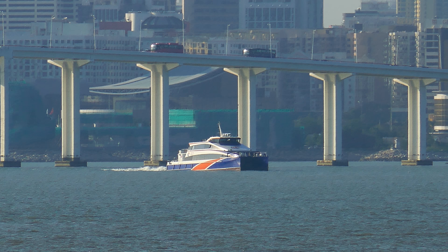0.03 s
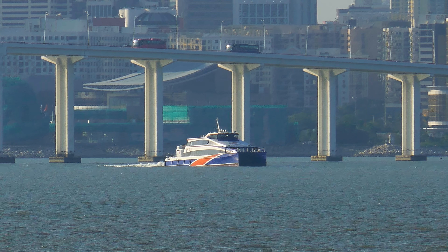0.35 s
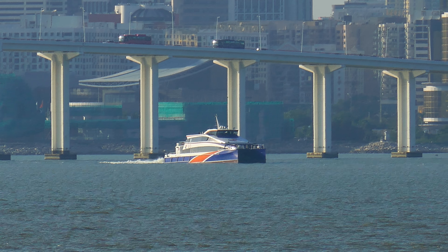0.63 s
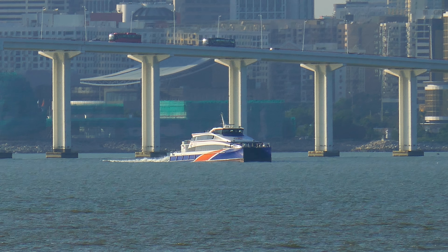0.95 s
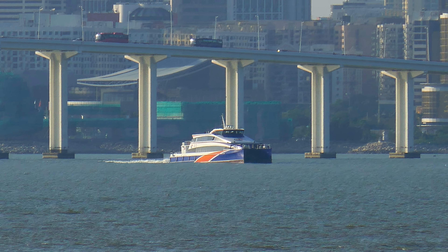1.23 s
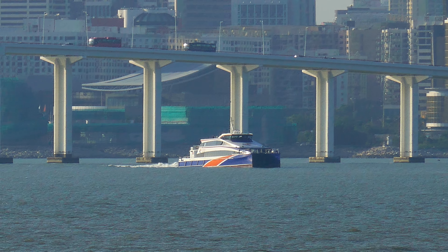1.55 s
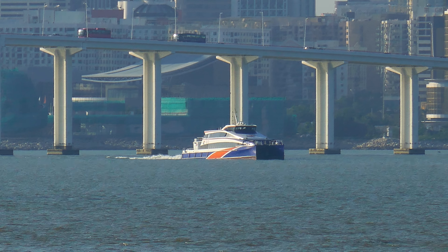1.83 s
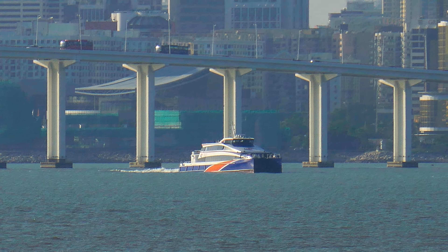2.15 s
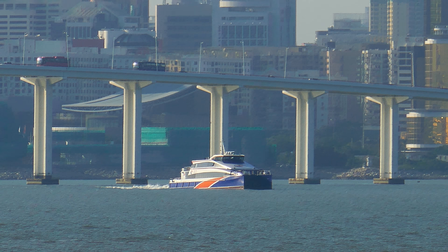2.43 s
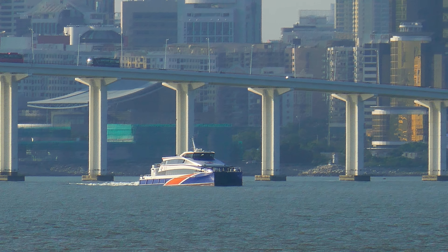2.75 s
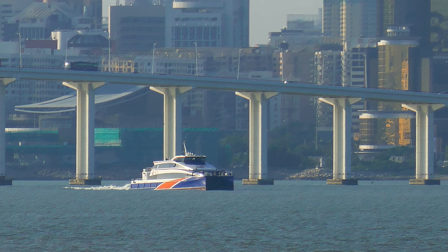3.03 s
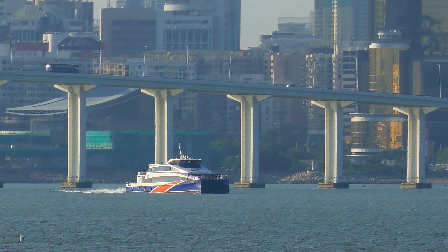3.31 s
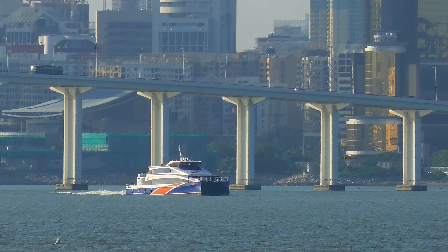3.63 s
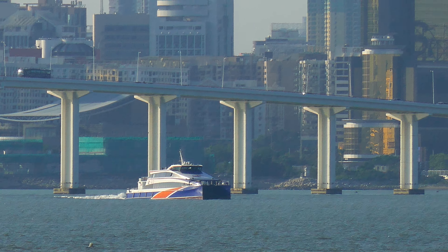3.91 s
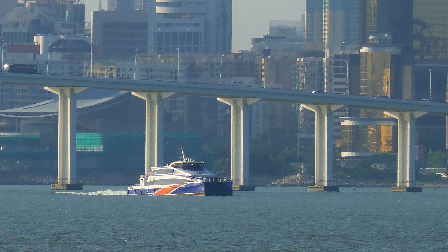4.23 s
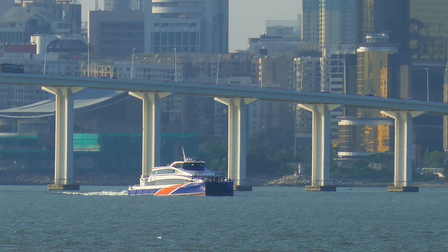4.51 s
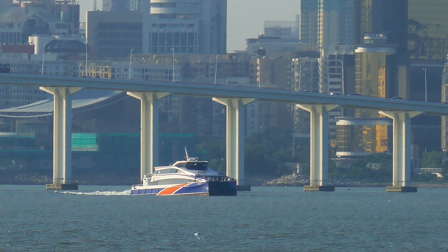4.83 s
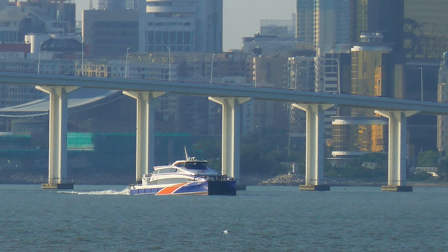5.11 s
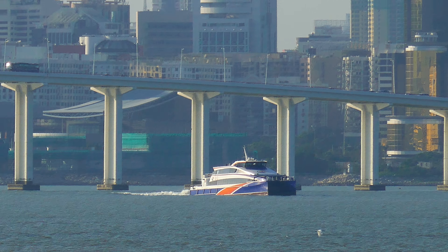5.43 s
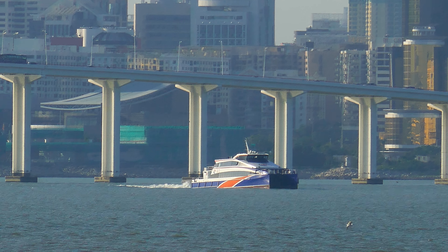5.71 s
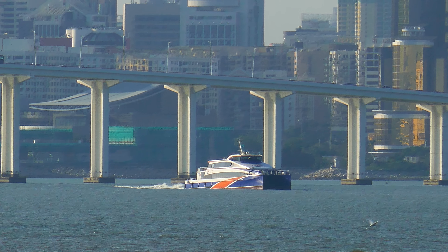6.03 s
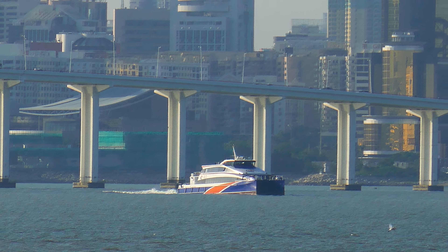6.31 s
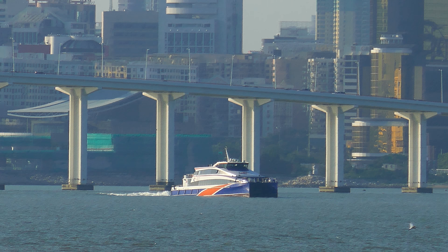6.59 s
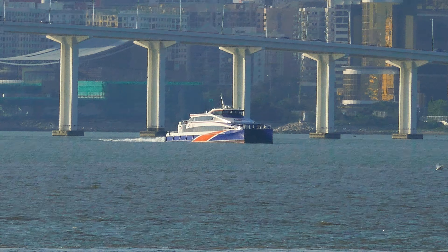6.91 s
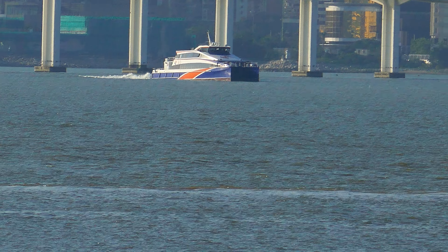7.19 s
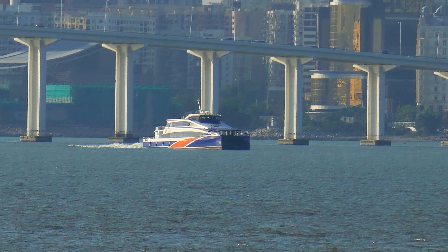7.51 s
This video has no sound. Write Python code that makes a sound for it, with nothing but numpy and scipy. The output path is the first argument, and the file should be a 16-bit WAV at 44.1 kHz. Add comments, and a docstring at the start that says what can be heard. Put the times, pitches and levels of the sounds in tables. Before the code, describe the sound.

Wind buffets an outdoor microphone on a shore in uneven lumps and thumps. Behind it, a distant ferry drones with a wash of churned water, growing loudest and hissier near the middle before sinking back. After the swell come a faint high squeak and a soft, airy whistle of wind. The gusts keep thudding to the end, with an occasional small tick nearby.

```python
"""Gusts buffet a microphone in short low thuds and hiss past it, on a shore far from a fast ferry.
The ferry's engines and water jets blur into one roar that swells and fades under a rush of churned water;
turbulence along the path makes both flutter. The thuds are pressure swings of eddies, and the level
dips briefly after some of them. Faint ticks, a stick-slip squeak and a breathy whistle sound close by."""
import sys
import numpy as np
from scipy import signal
from scipy.fft import rfft, irfft
from scipy.io import wavfile
from scipy.ndimage import uniform_filter1d

SR = 44100
rng = np.random.default_rng(int(sys.argv[2]) if len(sys.argv) > 2 else 0)


def generate_wav(signal):
    """Clip the signal to [-1, 1] and save it as 16-bit WAV at the path in sys.argv[1]."""
    frames = np.transpose(np.atleast_2d(signal))
    scaled = np.clip(frames, -1, 1) * 32767
    pcm = np.round(scaled).astype(np.int16)
    wavfile.write(sys.argv[1], SR, pcm)


N = 341775
TIME = np.arange(N) / SR
FREQ = np.fft.rfftfreq(N, 1 / SR)

# stereo width by frequency: (frequency [Hz], side minus mid [dB])
STEREO_WIDTH = [(30, -16.5), (70, -13.5), (125, -22.5), (250, -45), (600, -71), (2000, -35), (3000, -21.5),
                (4800, -28), (6500, -27.5), (7600, 3.5), (9000, 0), (12000, -4), (15000, -6.5)]
# swell of the ferry: (time [s], relative roar level [dB], relative water level [dB])
FERRY_SWELL = [(0, -36, -40), (.22, -31, -36.5), (.39, -40, -43.5), (.6, -33.5, -37), (1, -35.5, -40.5),
               (2.05, -38, -42.5), (2.33, -34, -39.5), (2.5, -40.5, -43), (2.9, -36, -41),
               (3.02, -34, -41.5), (3.2, -35, -41.5), (3.65, -28.5, -34), (4.27, -30.5, -37),
               (4.38, -38, -39.5), (4.7, -35.5, -40.5), (5.43, -38, -46), (5.6, -34.5, -41.5),
               (6.28, -36.5, -45.5), (6.36, -41, -48), (6.6, -48, -49.5), (6.77, -45.5, -47.5),
               (6.84, -41.5, -46.5), (7.15, -41, -46), (7.62, -38.5, -44), (7.75, -48, -51.5)]


def gain_of(db):
    """Amplitude ratio: tenfold for every 20 dB."""
    return 10 ** (np.asarray(db) / 20)


def unit_rms(x):
    """Normalisation to unit mean power."""
    return x / np.sqrt(np.mean(x ** 2) + 1e-20)


def response(points, hz):
    """Magnitude response, interpolated in dB over log frequency."""
    f, db = np.transpose(points)
    return gain_of(np.interp(np.log(hz + 1), np.log(f + 1), db))


def envelope(rows, column=1):
    """Amplitude envelope, interpolated in dB over time."""
    columns = np.transpose(rows)
    return gain_of(np.interp(TIME, columns[0], columns[column]))


def bell(s, length):
    """Gaussian pulse of height 1, centred on time s."""
    return np.exp(-2 * ((TIME - s) / length) ** 2)


def puffs(rows):
    """Gaussian pulses summed in amplitude."""
    return sum(gain_of(db) * bell(s, length) for s, db, length in rows)


def bumps_db(rows):
    """Gaussian pulses summed in decibels."""
    return sum(db * bell(s, length) for s, db, length in rows)


def add(mix, s, sound):
    """Superposition of a sound on the mix from time s."""
    part = mix[..., max(round(s * SR), 0):][..., :sound.shape[-1]]
    part += sound[..., :part.shape[-1]]


def wander(rate_hz):
    """Low-pass random fluctuation of rms 1."""
    return unit_rms(irfft(rfft(rng.standard_normal(N)) / (1 + (FREQ / rate_hz) ** 4), N))


def noise(magnitude):
    """Mid-side stereo noise: nearly mono in the bass and mids, wide in the high treble."""
    # channel balance: (frequency [Hz], left minus right [dB])
    balance = [(5000, 0), (8500, 2), (10000, 2), (12000, -1), (15000, -1)]
    mid, side = rfft(rng.standard_normal((2, N)))
    side = side * response(STEREO_WIDTH, FREQ)
    lean = np.sqrt(response(balance, FREQ))
    channels = np.array([(mid + side) * lean, (mid - side) / lean])
    return unit_rms(irfft(channels * magnitude, N))


def band(spectrum):
    """Spectral shaping of white noise."""
    return noise(response(spectrum, FREQ))


def resonant_noise(modes):
    """Noise shaped by steep spectral peaks, whose levels set their shares of the energy."""
    return noise(sum(gain_of(db) / np.sqrt(width) / (1 + ((FREQ - hz) / width) ** 2) ** 2
                     for hz, width, db in modes))


def low_cut(x):
    """High-pass filtering: the microphone's wind filter attenuates below 160 Hz."""
    return signal.sosfilt(signal.butter(4, 160, "highpass", fs=SR, output="sos"), x)


def scintillate(x, depth_db):
    """Scintillation: turbulent air on the path fades patches of the spectrum in and out."""
    frames = dict(nperseg=1024, noverlap=768)
    spectra = signal.stft(x, **frames)[2]
    patches = uniform_filter1d(rng.standard_normal(spectra.shape[1:]), size=4, axis=0)
    patches = unit_rms(uniform_filter1d(patches, size=16, axis=1))
    return unit_rms(signal.istft(spectra * gain_of(depth_db * patches), **frames)[1][:, :N])


def treble_gains():
    """Common modulation: swishes of spray move the gains of hiss and spray together."""
    # slow trend: (time [s], relative hiss level [dB], relative spray level [dB])
    trend = [(0, -67.5, -68), (.24, -66, -71), (.36, -73.5, -73), (.68, -66, -69.5), (.95, -70, -74.5),
             (2.1, -67, -71), (2.55, -64, -71), (3.17, -63, -66), (3.3, -59, -66), (3.65, -53, -57.5),
             (4.2, -60, -61), (4.36, -62.5, -64.5), (4.6, -64, -64), (5.25, -70.5, -71), (5.7, -69, -68),
             (6.25, -71, -71.5), (6.52, -76.5, -78.5), (6.95, -70.5, -75.5), (7.58, -67, -71),
             (7.75, -74, -80)]
    # swishes: (peak time [s], lift [dB], length [s])
    swishes = [(2.1, -1, .1), (2.33, 4, 0.13), (2.677, 2, 0.14), (2.896, 3.5, 0.067), (4.13, 2, 0.076),
               (4.5, 3, 0.058)]
    lift = gain_of(bumps_db(swishes))
    return envelope(trend, column=1) * lift, envelope(trend, column=2) * lift


def self_noise():
    """Self-noise of the microphones: a steady floor, uncorrelated between the channels."""
    # noise floor: (frequency [Hz], relative spectral density [dB])
    floor = [(20, -5.5), (100, -2), (300, 5), (800, -11.5), (2200, 1), (3500, -5.5), (5000, -16),
             (5600, -32)]
    white = rfft(rng.standard_normal((2, N)))
    return gain_of(-76) * unit_rms(irfft(white * response(floor, FREQ), N))


def faint_bands():
    """Narrow-band noise: two very faint bands near 6 and 7 kHz drift in level."""
    # envelope of the bands: (time [s], level [dB])
    band_level = [(0, -89), (.8, -86), (1.8, -84), (2.7, -91.5), (4.8, -98), (5.6, -88.5), (6.5, -89),
                  (7, -82.5), (7.75, -86)]
    # noise bands: (frequency [Hz], width [Hz], relative level [dB])
    band_peaks = [(6150, 320, 4.5), (6900, 270, 1.5)]
    return envelope(band_level) * resonant_noise(band_peaks)


def breeze():
    """Turbulent flow noise: an airy hiss that swells and flutters."""
    # airy hiss: (frequency [Hz], relative spectral density [dB])
    hiss_spectrum = [(5500, -59.5), (7000, -46), (7700, -24.5), (8200, -11.5), (9000, -2), (9800, 4),
                     (11000, 1.5), (13000, 0), (15000, -2.5), (15700, -15.5)]
    hiss_gain, _ = treble_gains()
    flutter_db = 0.6 * wander(rate_hz=14) + 0.4 * wander(rate_hz=70)
    return gain_of(4.5 + flutter_db) * hiss_gain * scintillate(band(hiss_spectrum), depth_db=1.5)


def ticks():
    """Exponential decay of small band-limited noise bursts near the microphone."""
    # ticks: (time [s], level [dB], centre [Hz], width [Hz], 60 dB decay time [s])
    bursts = [(1.889, -51, 13000, 2200, 0.049), (3.268, -42, 3100, 450, .04), (3.274, -38, 2220, 500, .07),
              (4.708, -51.5, 12500, 1500, .05), (5.178, -45.5, 12900, 2000, .016),
              (6.448, -62, 12000, 1800, .08), (6.935, -59, 11500, 1800, .06), (6.987, -44, 2650, 200, 0.04),
              (6.987, -37, 1600, 800, 0.03)]
    out, t = np.zeros((2, N)), TIME[:SR // 4]
    f = np.fft.rfftfreq(len(t), 1 / SR)
    rise = np.minimum(t / 0.00068, 1)
    for s, db, hz, width, t60 in bursts:
        mid, side = rfft(rng.standard_normal((2, len(t)))) * np.exp(-.5 * ((f - hz) / width) ** 2)
        side = side * response(STEREO_WIDTH, f)
        burst = unit_rms(irfft(np.array([mid + side, mid - side]), len(t)))
        add(out, s, gain_of(db) * burst * rise * np.exp(-np.log(1000) * t / t60))
    return low_cut(out)


def squeak():
    """Stick-slip friction excites a surface's high resonances in uneven grains."""
    # one sharp slip and two small ones: (time [s], level [dB])
    slip_level = [(5.385, -120), (5.397, -50), (5.408, -54), (5.425, -64), (5.5, -65), (5.545, -68),
                  (5.555, -61), (5.567, -67), (5.58, -60), (5.61, -120)]
    # surface resonances: (frequency [Hz], width [Hz], relative level [dB])
    surface_modes = [(9600, 1000, 3), (6300, 500, -26)]
    grains = unit_rms(gain_of(2.8 * wander(rate_hz=200)))
    return envelope(slip_level) * grains * resonant_noise(surface_modes)


def whistle():
    """Flow-excited resonance: a gust sings in breathy puffs, the stronger ones raising an overtone."""
    # puffs of air: (peak time [s], level [dB], length [s])
    air_puffs = [(5.692, -42.5, 0.11), (5.86, -44, 0.072), (6.027, -45.5, 0.41)]
    # resonances and overtone: (frequency [Hz], width [Hz], relative level [dB])
    main_modes = [(1927, 120, 7.5), (2170, 71, 3.5)]
    overtone_modes = [(3770, 100, 0)]
    blow = puffs(air_puffs)
    overtone_gain = gain_of(-59) * (blow / blow.max()) ** 1.5
    tone = blow * resonant_noise(main_modes) + overtone_gain * resonant_noise(overtone_modes)
    tone *= gain_of(wander(rate_hz=20))
    warped_time = TIME + np.cumsum(0.005 * wander(rate_hz=10)) / SR  # pitch wavers by 0.5 % rms
    return np.array([np.interp(warped_time, TIME, channel) for channel in tone])


def wind_strength():
    """Power addition of bell-shaped gusts and a light, uneven breeze."""
    # gusts: (peak time [s], relative level [dB], length [s])
    gusts = [(0.014, -30.5, 0.058), (0.295, -34.5, 0.17), (0.703, -40, 0.019), (0.925, -34, 0.038),
             (1.118, -35, 0.037), (1.34, -34.5, 0.048), (1.471, -43.5, 0.077), (1.988, -38.5, 0.069),
             (2.44, -33.5, 0.1), (2.772, -37.5, 0.042), (3.128, -45, 0.038), (3.87, -36.5, 0.36),
             (4.065, -35, 0.021), (4.27, -32, 0.14), (5.024, -39.5, 0.14), (5.278, -32, 0.03),
             (5.416, -36, 0.02), (5.796, -44.5, 0.21), (6.332, -35, 0.087), (6.5, -35.5, 0.13),
             (6.586, -38.5, 0.03), (6.998, -40, 0.038), (7.176, -39, 0.12), (7.689, -34, 0.071)]
    light_wind = gain_of(-48 + 3.7 * wander(rate_hz=6.4))
    return np.hypot(puffs(gusts), light_wind)


def thuds():
    """Pressure transients: each large eddy is one abrupt swing, a sine under a Gaussian window."""
    # eddies: (peak time [s], level [dB], frequency [Hz], length [s])
    eddies = [(0.022, -21, 650, 0.0012), (0.331, -22.5, 454, 0.0031), (0.674, -22.5, 510, 0.0029),
              (0.692, -27.5, 594, 0.004), (0.712, -25.5, 710, 0.0034), (0.7188, -23, 575, 0.0053),
              (0.7232, -22.5, 340, 0.0025), (0.932, -27, 290, 0.0069), (0.9385, -22.5, 375, 0.0021),
              (1.312, -24, 530, 0.0027), (2.1817, -24, 560, 0.0025), (2.39, -23, 340, 0.002),
              (2.423, -26, 435, 0.0034), (2.792, -25.5, 380, 0.0038), (2.798, -25, 342, 0.003),
              (3.4035, -19.5, 530, .0016), (3.423, -21, 520, 0.0023), (3.4685, -20, 600, 0.0019),
              (3.672, -18, 510, 0.0023), (3.8835, -19, 530, 0.0014), (3.979, -23, 450, 0.0026),
              (3.992, -24.5, 315, 0.011), (4.092, -19, 420, 0.0019), (4.108, -23, 400, 0.0034),
              (4.123, -23.5, 490, 0.0044), (4.2345, -13, 477, 0.0011), (4.284, -24, 330, 0.002),
              (4.296, -20, 400, 0.0034), (4.301, -23.5, 380, 0.0028), (4.616, -31, 570, 0.00093),
              (4.959, -20, 530, .0017), (5.201, -21, 517, 0.0012), (5.3934, -29, 480, 0.0018),
              (5.4205, -26, 360, 0.0025), (6.324, -30.5, 410, 0.0051), (6.351, -35, 420, .0016),
              (6.376, -26, 380, 0.0024), (6.449, -28.5, 380, 0.0034), (6.4643, -28, 360, 0.0023),
              (6.4712, -32, 430, 0.0028), (6.479, -24, 450, 0.0014), (6.489, -38, 330, 0.0037),
              (6.4953, -27, 287, 0.0038), (6.5357, -23.5, 423, 0.0013), (6.998, -30.5, 450, 0.0032),
              (7.156, -31, 403, 0.0011), (7.204, -32, 360, 0.0025), (7.621, -25, 560, 0.0012),
              (7.625, -22.5, 333, .0028), (7.645, -25.5, 390, 0.0023), (7.6617, -29, 450, 0.0016),
              (7.691, -22.5, 380, 0.0021), (7.711, -25, 390, 0.002)]
    out, t = np.zeros(N), TIME[:SR // 40] - TIME[SR // 80]
    for (s, db, hz, length), phase in zip(eddies, rng.random(len(eddies))):
        window = np.exp(-2 * (t / length) ** 2)
        add(out, s + t[0], gain_of(db) * window * np.sin(2 * np.pi * (hz * t + phase)))
    return out


def buffeting():
    """Turbulent pressure: eddies strike the microphone in lumps and thuds, over a deep rumble."""
    # wind lumps and deep rumble: (frequency [Hz], relative spectral density [dB])
    lump_spectrum = [(60, -46), (130, -20.5), (180, -6.5), (250, 0), (340, -1), (450, -4), (700, -30),
                     (1200, -39.5), (5000, -82)]
    rumble_spectrum = [(20, -34.5), (55, -31), (75, -22.5), (100, -12), (135, -1), (175, 3), (230, 4),
                       (350, -15), (1000, -57), (4000, -100)]
    wind = wind_strength()
    lumps = gain_of(-5) * wind * unit_rms(band(lump_spectrum) * gain_of(1.96 * wander(rate_hz=160)))
    # faster wind sheds smaller eddies, so the deep rumble grows more slowly than the lumps
    rumble = wind ** 0.3 * band(rumble_spectrum) * gain_of(4.8 * wander(rate_hz=14))
    return gain_of(-53.5) * unit_rms(rumble) + low_cut(lumps + thuds())


def spray():
    """Fine spray of the wake: treble noise under strong scintillation."""
    # spray: (frequency [Hz], relative spectral density [dB])
    spectrum = [(2000, -17), (2750, 3.5), (3100, 10.5), (3400, 6.5), (3700, 4.5), (4100, -1), (4300, 2),
                (4750, -0.5), (5100, -8), (5300, -40.5), (5600, -61.5)]
    _, spray_gain = treble_gains()
    return gain_of(7) * spray_gain * scintillate(band(spectrum), depth_db=3.5)


def wake_rush():
    """Churned water radiates broadband noise that swells and fades with the ferry."""
    # rushing water: (frequency [Hz], relative spectral density [dB])
    spectrum = [(200, -55.5), (900, -8.5), (1300, 1.5), (1600, 1.5), (1780, 1.5), (2000, 1.5), (2200, -1.5),
                (2400, -7.5), (2490, -6), (2570, -8), (2700, -7.5), (3000, -19.5), (4100, -31.5),
                (5400, -58.5)]
    water_gain = envelope(FERRY_SWELL, column=2)
    return gain_of(-0.5) * water_gain * scintillate(band(spectrum), depth_db=1.23)


def engine_roar():
    """Spectral broadening: engine tones blur into exhaust noise, with a deep body and a hollow top."""
    # exhaust and hollow upper roar: (frequency [Hz], relative spectral density [dB])
    exhaust_spectrum = [(60, -49.5), (130, -46), (220, -12.5), (330, -4.5), (480, -0.5), (620, 2.5),
                        (760, -0.5), (860, -5.5), (1100, -13.5), (1600, -40), (3000, -56.5), (5000, -86)]
    hollow_spectrum = [(350, -69.5), (750, -3), (900, 1.5), (1020, 3), (1170, 1.5), (1300, -10), (1700, -7),
                       (5000, -80.5)]
    # engine tones and body resonance: (frequency [Hz], width [Hz], relative level [dB])
    engine_tones = [(74, 2.8, -31), (133, 3, -35), (313.1, 4.3, 2.5), (495.7, 15, 8), (607, 13, 6.5),
                    (730, 28, 7)]
    body_modes = [(383, 140, 0)]
    # the hollow part sinks at the height of the swell and in the lull: (time [s], depth [dB], length [s])
    sinks = [(3.9, 8.5, 1.29), (6.66, 6, 0.35)]
    engine_gain, water_gain = envelope(FERRY_SWELL, column=1), envelope(FERRY_SWELL, column=2)
    body = gain_of(-35) * bell(s=3.84, length=0.51) * low_cut(resonant_noise(body_modes))
    exhaust = scintillate(band(exhaust_spectrum), depth_db=0.14)
    drone = gain_of(-8.5) * resonant_noise(engine_tones)
    flutter_db = 0.98 * wander(rate_hz=23)
    roar = gain_of(-1.31 + flutter_db) * engine_gain * (exhaust + drone)
    hollow = gain_of(0.5 - bumps_db(sinks)) * water_gain * scintillate(band(hollow_spectrum), depth_db=2)
    return roar + body + hollow


def ferry():
    """Amplitude modulation: roar and rush surge together, while the spray keeps its own level."""
    # short surges: (peak time [s], lift [dB], length [s])
    surges = [(0.888, 2, 0.091), (1.273, 3, 0.06), (1.455, 3.5, 0.03), (1.888, 2.5, 0.16),
              (3.256, 3, 0.045), (5.545, 4.5, 0.037), (5.963, 2.5, 0.054), (7.6, 1.5, 0.027)]
    roar_and_rush, fine_spray = engine_roar() + wake_rush(), spray()
    surge_db = bumps_db(surges) + 0.58 * wander(rate_hz=16)
    return roar_and_rush * gain_of(surge_db) + fine_spray


def scene():
    """Superposition of the distant ferry, the wind and the small sounds nearby."""
    return (ferry() + breeze() + faint_bands() + whistle() + buffeting()
            + ticks() + squeak() + self_noise())


def record(dry):
    """Gain dips with exponential recovery follow some thuds; then soft ends and a band limit."""
    # dips of the whole sound: (time [s], depth [dB], recovery time [s])
    dips = [(0.727, 12.5, 0.08), (0.942, 1, 0.059), (1.36, 5, 0.041), (2.397, 4, 0.1), (2.806, 3.5, 0.057),
            (3.43, 0, 0.031), (4.307, 4, 0.06), (5.065, 2, 0.034), (6.501, 5, 0.074)]
    fade_s, cutoff_hz = 0.004, 15730
    dip_db = sum(depth * (TIME > s) * np.exp(-abs(TIME - s) / recovery) for s, depth, recovery in dips)
    smooth_dip_db = uniform_filter1d(uniform_filter1d(dip_db, size=160), size=160)
    ends = np.minimum(np.minimum(TIME, TIME[::-1]) / fade_s, 1)
    low_pass = signal.firwin(511, cutoff_hz, window=("kaiser", 9), fs=SR)
    return signal.oaconvolve(dry * gain_of(-smooth_dip_db) * ends, low_pass[None], "same")


dry = scene()
out = record(dry)
generate_wav(out)
```